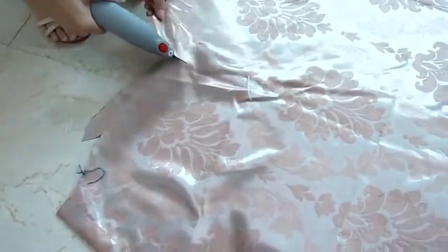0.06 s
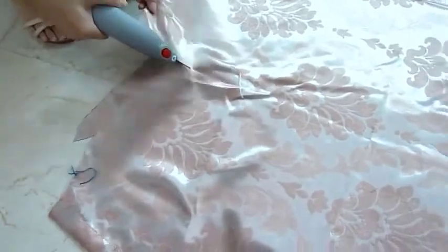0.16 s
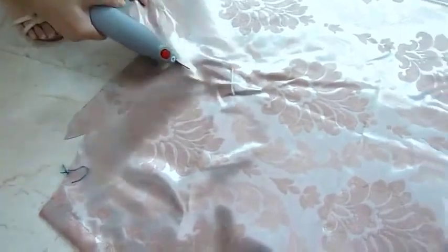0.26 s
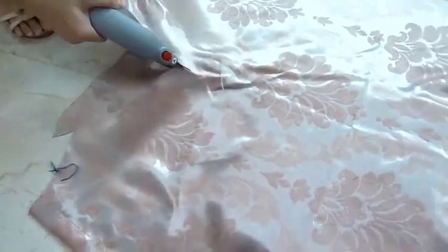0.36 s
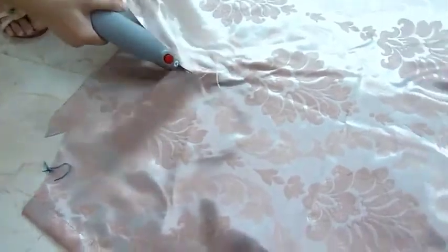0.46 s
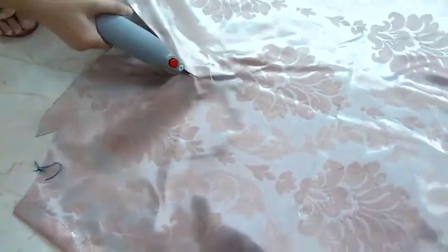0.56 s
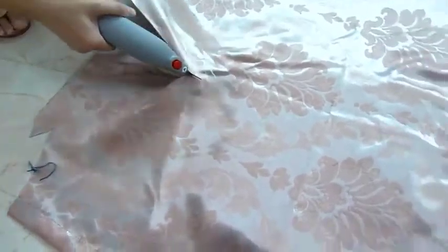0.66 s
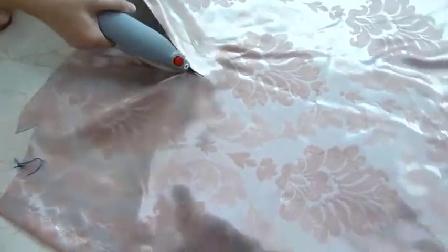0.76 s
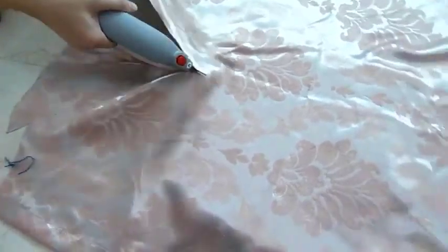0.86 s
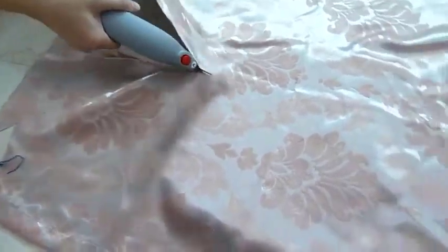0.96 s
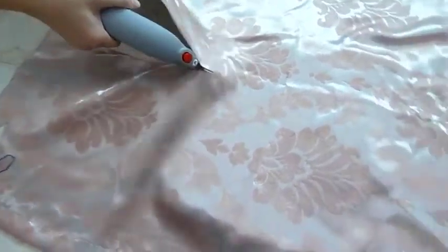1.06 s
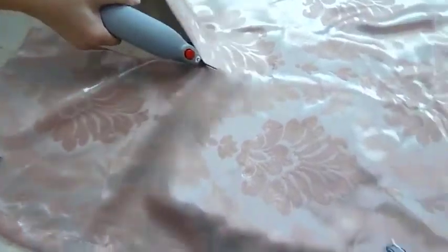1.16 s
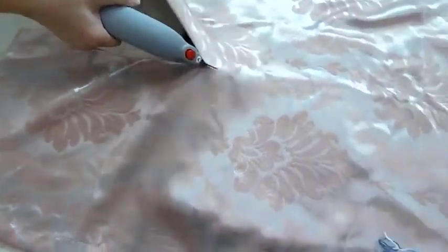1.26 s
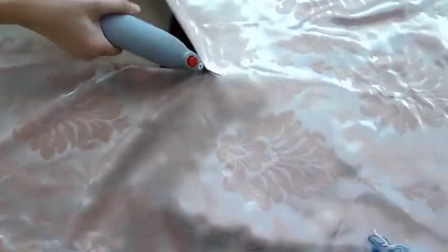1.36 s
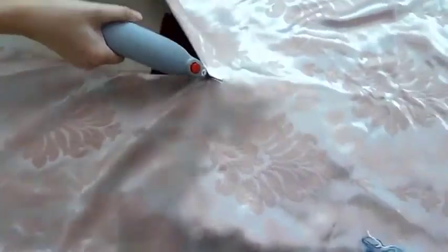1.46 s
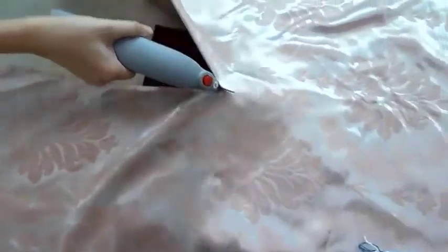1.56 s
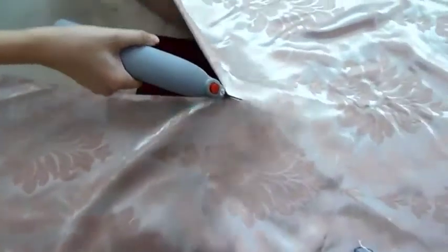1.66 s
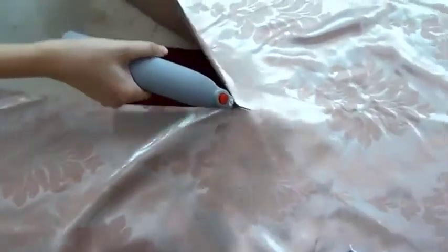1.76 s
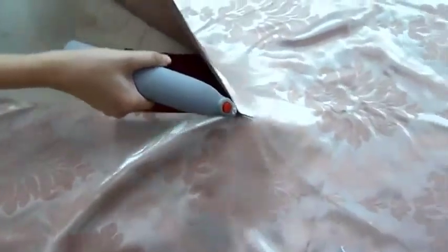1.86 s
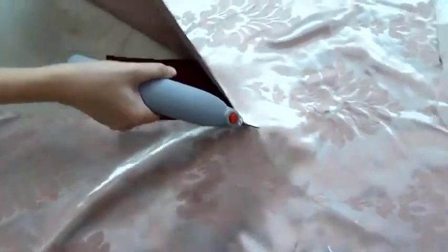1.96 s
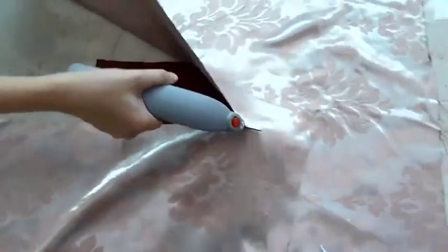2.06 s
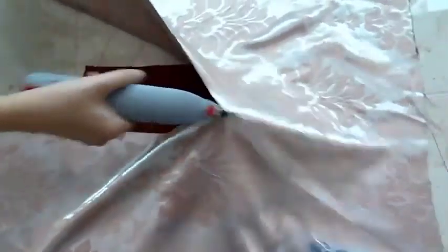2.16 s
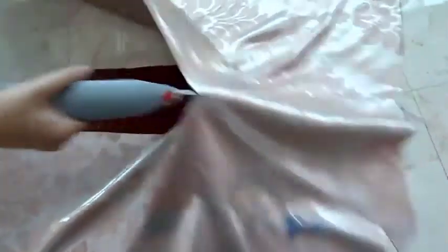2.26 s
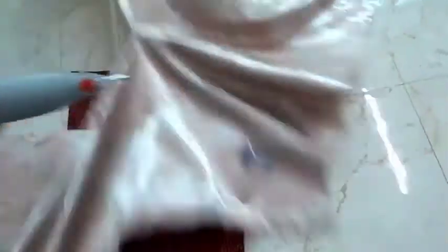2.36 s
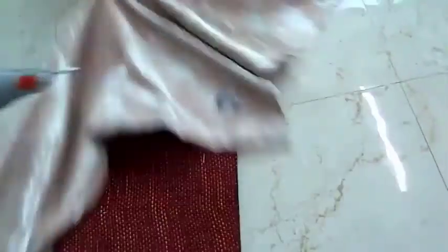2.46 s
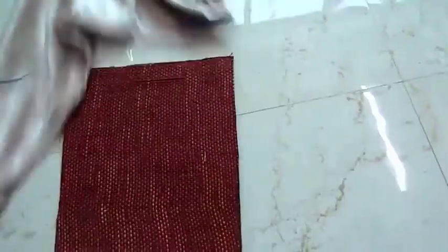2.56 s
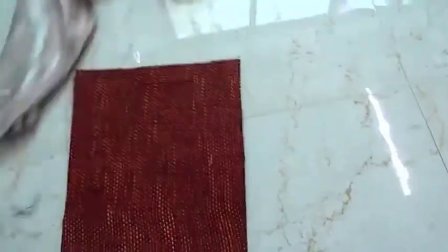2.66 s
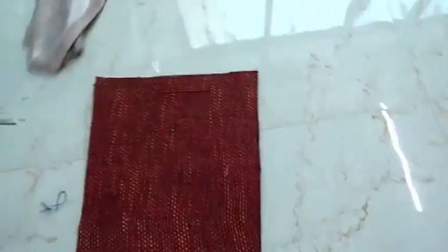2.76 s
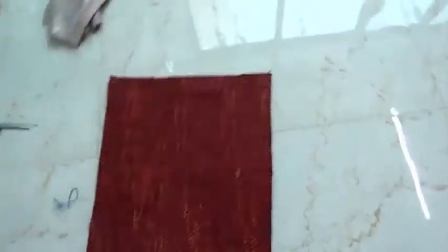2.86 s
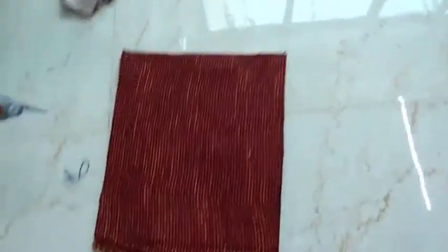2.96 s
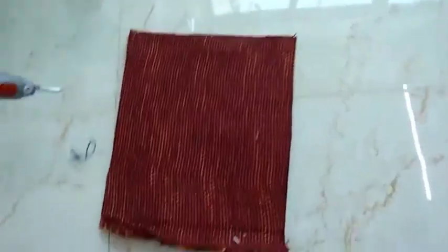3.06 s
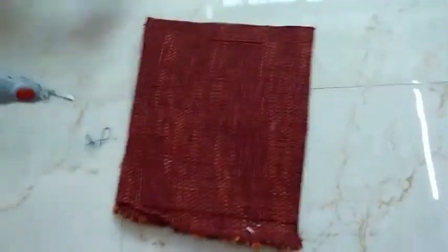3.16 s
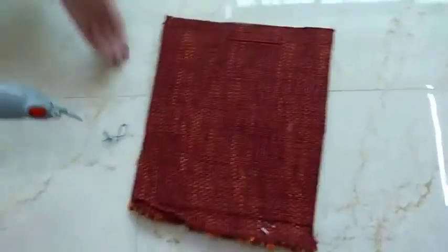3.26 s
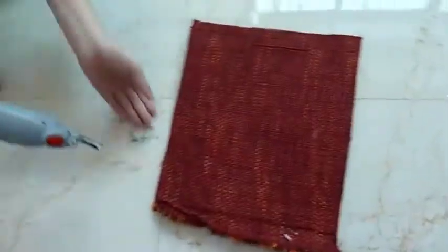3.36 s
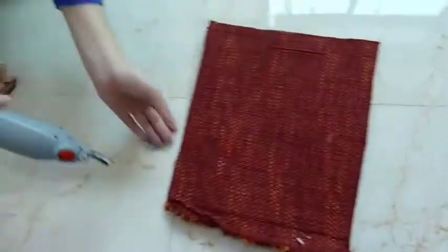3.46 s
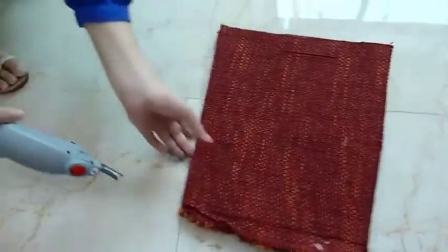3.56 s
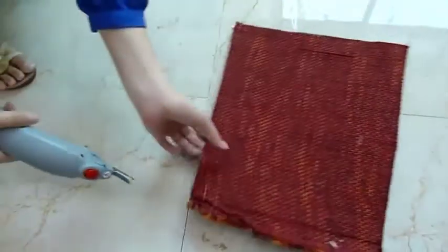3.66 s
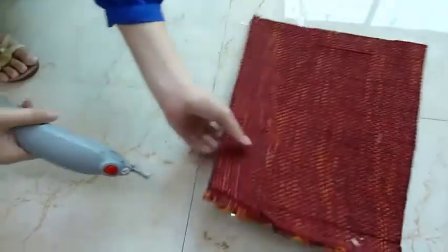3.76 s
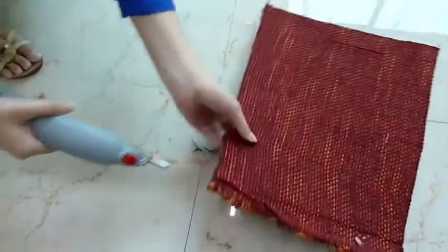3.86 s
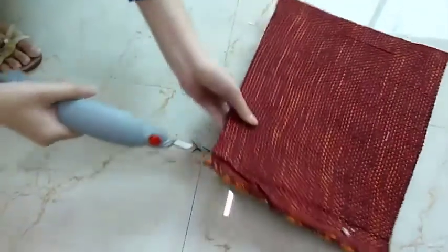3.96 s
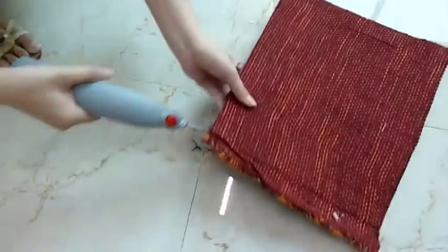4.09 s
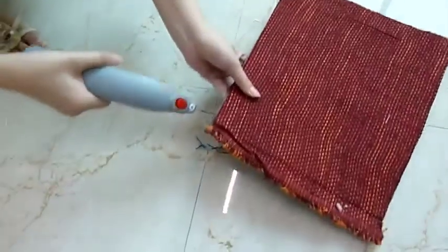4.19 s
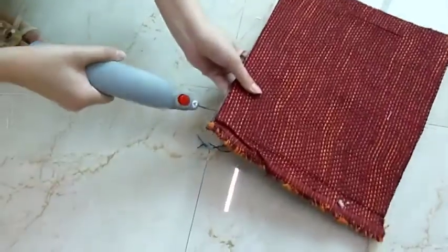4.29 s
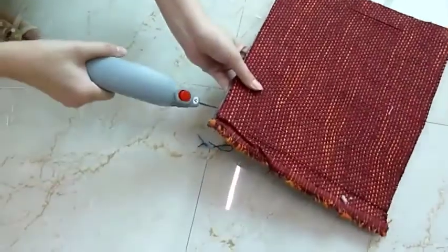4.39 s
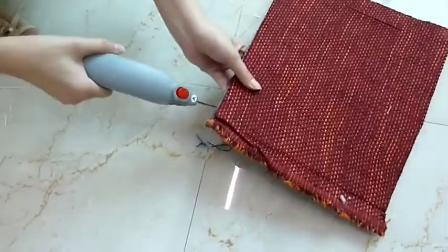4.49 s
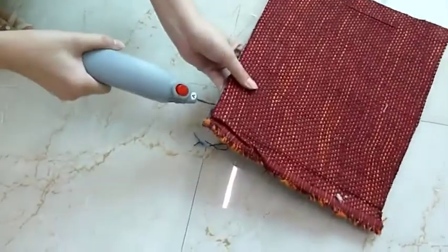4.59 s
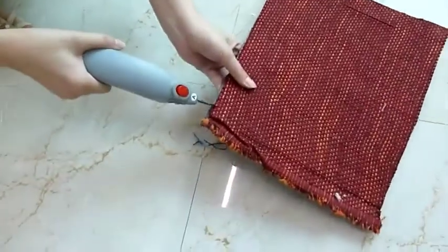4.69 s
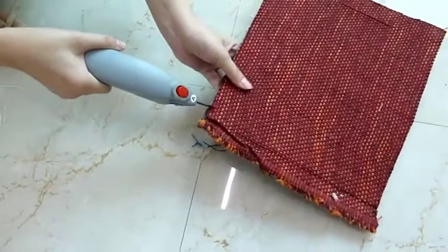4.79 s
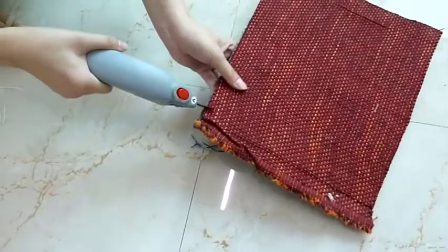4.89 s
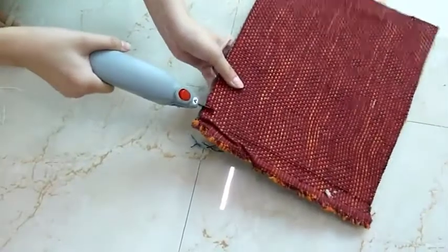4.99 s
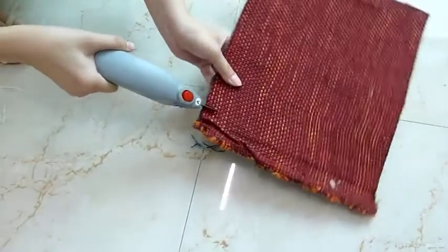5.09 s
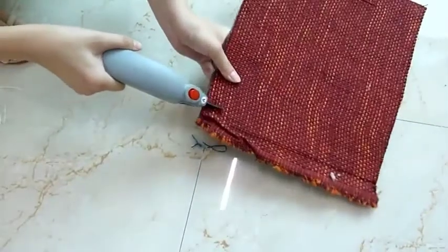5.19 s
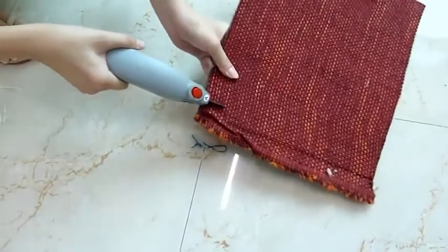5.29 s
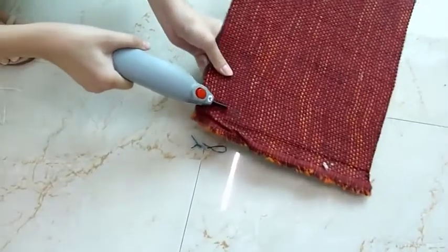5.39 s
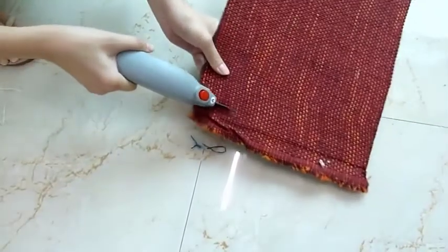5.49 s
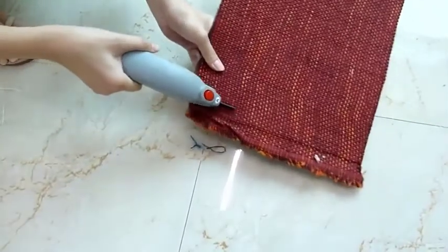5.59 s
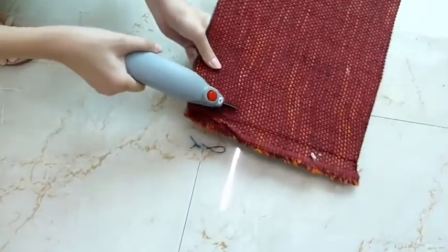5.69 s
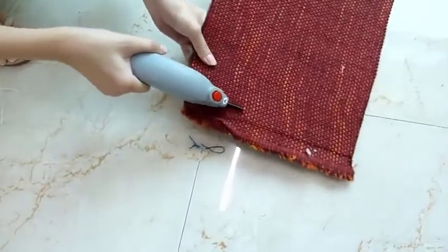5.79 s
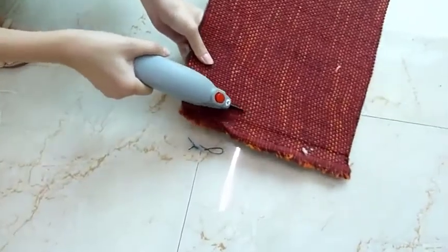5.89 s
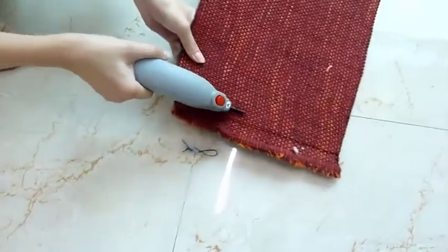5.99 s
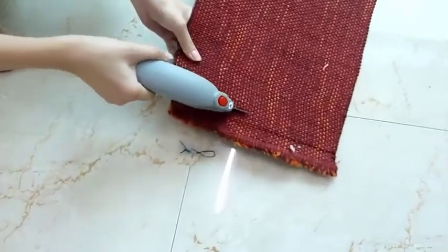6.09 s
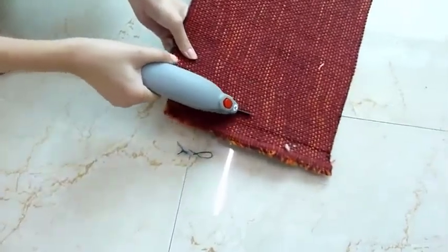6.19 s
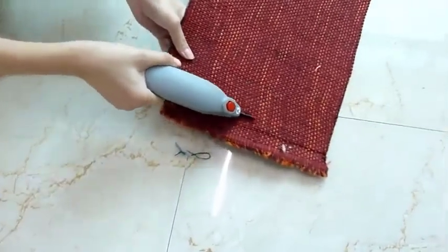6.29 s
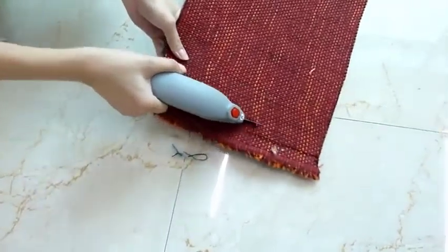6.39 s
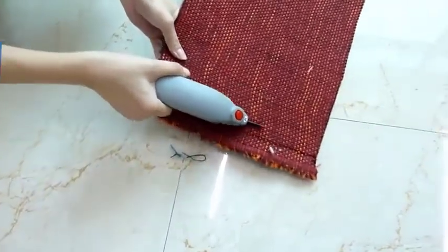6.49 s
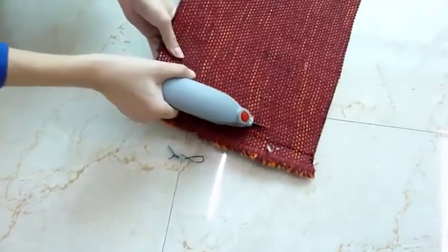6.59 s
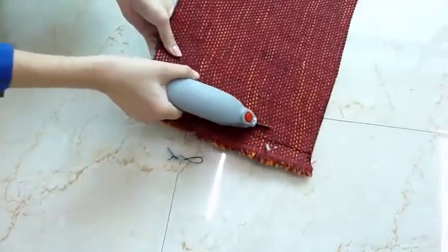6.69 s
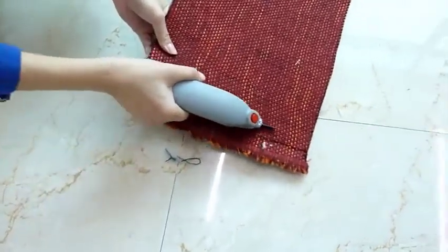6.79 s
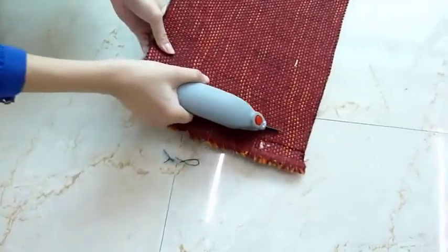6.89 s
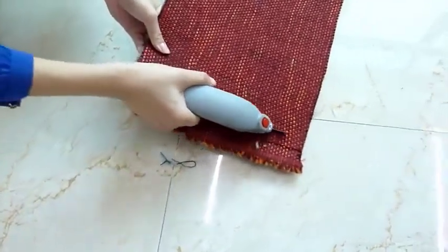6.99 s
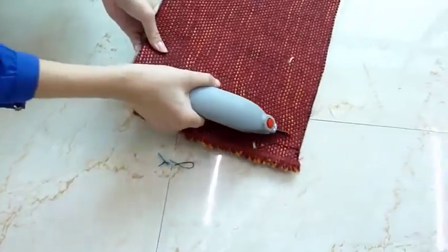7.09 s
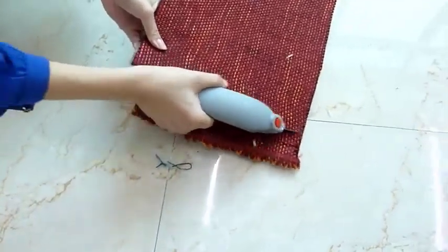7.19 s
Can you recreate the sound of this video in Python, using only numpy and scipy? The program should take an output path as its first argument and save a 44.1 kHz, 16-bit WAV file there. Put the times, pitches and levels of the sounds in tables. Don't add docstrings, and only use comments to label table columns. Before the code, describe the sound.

From the start, a handheld electric cutter buzzes right at the microphone: a rattling, gritty whir with a whining gear tone and very fast blade snaps, nearly sixty a second, cutting thin cloth. A slight hollow hum grows beneath it. At about 2.1 seconds it is switched off and runs down within a few tenths, with cloth sweeping away. From 2.5 to 4.7 seconds the room is quiet, with soft hiss and faint distant machinery drone; small knocks cluster around 2.9, lighter ticks come near 3.2 and 3.6, and gentle fabric brushes pass. At about 4.8 the motor clicks and jolts on, loudest and harshest just afterwards with a knock at 4.9. It bites into a thick mat, the strokes sagging to around forty a second, coarser and throbbing, with metallic singing after 6.3, still running at the end around 7.2.

```python
import sys
import numpy as np
from scipy import signal
from scipy.fft import rfft, irfft
from scipy.io import wavfile
from scipy.ndimage import uniform_filter1d, map_coordinates

SR = 44100
rng = np.random.default_rng(int(sys.argv[2]) if len(sys.argv) > 2 else 0)


def master_out(mix):
    frames = np.transpose(np.atleast_2d(mix))
    ceiling = np.clip(frames, -1, 1)
    pcm = np.round(ceiling * 32767).astype(np.int16)
    wavfile.write(sys.argv[1], SR, pcm)


def elevation(decibels):
    levels = np.asarray(decibels, float)
    return 10 ** (levels / 20)


N = 319284

BITE_AT, SNAP_AT = .3, .655
OFF_S, STILL_S, ON_S = 2.13, 2.5, 4.77


def evened(x):
    return x / np.sqrt(np.mean(x ** 2) + 1e-20)


def read(points, hz):
    f, value = np.transpose(points)
    return np.interp(np.log(hz + 1), np.log(f + 1), value)


def colour_db(colour, modes, hz):
    return read(colour, hz) + sum(top / (1 + ((hz - f) / (w / 2)) ** 2) for f, w, top in modes)


def curves(rows):
    s, *columns = np.transpose(rows)
    return [np.interp(np.arange(N) / SR, s, c) for c in columns]


def glided(x):
    return uniform_filter1d(x * 1., size=round(.05 * SR))


def wander(size):
    return evened(uniform_filter1d(uniform_filter1d(rng.standard_normal(N), size), size))


def bump(turns, at, sharp):
    return np.exp(sharp * (np.cos(2 * np.pi * (turns - at)) - 1))


def ring(x, hz, width):
    return signal.lfilter(*signal.iirpeak(hz, hz / width, SR), x)


def band(hz, width):
    r = np.exp(-np.pi * width / SR)
    slow = signal.lfilter([1], np.convolve([1, -r], [1, -r]), rng.standard_normal((2, N)))
    carrier = np.exp(2j * np.pi * np.cumsum(hz * np.ones(N)) / SR)
    return evened(((slow[0] + 1j * slow[1]) * carrier).real)


def hiss(colour, modes=(), patchy_db=2.0):
    # Hz, left-right likeness (0 to 1).
    likeness = [(60, 0.76), (150, 0.88), (380, 0.91), (950, 0.8), (2380, 0.95), (5980, 0.26), (15000, 0.31)]
    frames, hz = N // 256 + 5, np.fft.rfftfreq(1024, 1 / SR)
    a, b, c, d, patches = rng.standard_normal((frames, 513, 5)).T
    patches = evened(uniform_filter1d(uniform_filter1d(patches, size=7, axis=0), size=30, axis=1))
    same = np.clip(read(likeness, hz), 0, 1)[:, None]
    left = a + 1j * b
    right = same * left + np.sqrt(1 - same ** 2) * (c + 1j * d)
    level_db = colour_db(colour, modes, hz)[:, None] + patchy_db * patches
    z = np.array([left, right]) * elevation(level_db)
    return evened(signal.istft(z, nperseg=1024, noverlap=768)[1][:, :N])


def air():
    # Hz, dB per Hz.
    air_colour = [(12, -42), (20, -7), (49, -12.5), (146, -6.5), (182, -7), (222, -5.5), (357, -3),
                  (513, -11), (574, -8), (825, -8.5), (897, -11), (3630, -22.5), (16000, -41)]
    # Hz, width in Hz, level in dB.
    drones = [(49.2, 22, -63.5), (118, 8.6, -62.5), (187, 15, -62.5), (251.4, 16, -60), (349.6, 6.9, -59.5),
              (428, 22, -67)]
    return elevation(-48) * hiss(air_colour, patchy_db=0.2) + sum(elevation(db) * band(hz, w) for hz, w, db in drones)


def room(x):
    # Hz, time to fall 60 dB in seconds.
    decay = [(300, 0.35), (2000, 1), (10000, 0.8)]
    echoes = np.zeros((2, SR // 2))
    at = np.arange(100, SR // 2 - 20, 20) + rng.integers(0, 20, (2, (SR // 2 - 101) // 20))
    np.put_along_axis(echoes, at, rng.choice([-1., 1.], at.shape), 1)
    hz, t, z = signal.stft(echoes, SR, nperseg=256)
    tail = signal.istft(z * elevation(-60 * t / read(decay, hz)[:, None]), SR, nperseg=256)[1]
    return signal.fftconvolve(x[None], tail / np.linalg.norm(tail[0]), axes=1)[:, :N]


def rustle(t):
    # Hz, dB per Hz.
    cloth_colour = [(200, -22), (500, -4), (1250, -13), (2100, -13), (5000, -12), (10200, -15.5),
                    (14500, -21), (16000, -25)]
    # middle in seconds, half length in seconds, level in dB.
    sweeps = [
        (2.36, .11, -41),
        (2.875, 0.028, -57),
        (2.97, 0.078, -46),
        (3.477, 0.12, -49.5),
        (3.664, 0.083, -54),
        (4.17, .04, -56),
        (4.758, 0.1, -51.5),
    ]
    power = elevation(2 * -55) + sum(elevation(2 * db) * np.exp(-((t - s) / d) ** 2) for s, d, db in sweeps)
    return np.sqrt(power) * hiss(cloth_colour, patchy_db=1.5)


def taps():
    # start in seconds, peak in dB, Hz, time to fall 60 dB in seconds, noise tick in dB.
    knocks = [(2.849, -38, 1300, .014, -37), (2.852, -45, 840, .2, -70), (2.917, -36, 2600, .022, -47),
              (2.9435, -30, 930, .024, -44), (2.977, -33, 400, .03, -44), (2.988, -32, 560, .03, -50),
              (2.992, -33, 300, .04, -50), (3.248, -50, 5000, .006, -48), (3.624, -44, 11000, .008, -60),
              (4.7675, -36, 2300, .012, -26), (4.913, -22, 1300, .025, -40), (4.918, -25, 900, .015, -45),
              (4.922, -27, 550, .02, -40)]
    out, t = np.zeros(N), np.arange(3000) / SR
    for (s, db, hz, t60, tick_db), noise in zip(knocks, rng.standard_normal((30, 3000))):
        onset = np.minimum(t / 0.00049, 1)
        knock = np.sin(2 * np.pi * hz * t) * elevation(db - 60 * t / max(t60, .004)) * onset
        tick = noise * elevation(tick_db + 8 - 60 * t / .012)
        out[round(s * SR):][:3000] += knock + ring(ring(tick, 4200, 6000), 4200, 7000)
    return out


def crank():
    # time in seconds, strokes per second. First the run on thin cloth.
    thin = [(0, 59.15), (.203, 59.26), (.605, 58.15), (1.393, 58.38), (1.996, 56.3), (2.13, 56.81)]
    coast = [
        (2.2, 48),
        (2.3, 30),
        (2.5, 8),
    ]
    spin_up = [
        (4.765, 7.6),
        (4.79, 30),
        (4.81, 35),
        (4.835, 43),
    ]
    thick = [(4.86, 52.7), (4.99, 52.46), (5.45, 44.09), (5.653, 43.62), (6.178, 38.52), (6.373, 41.52),
             (6.46, 37.47), (6.84, 41.73), (7.24, 40.35)]
    # time in seconds, turns.
    position = [
        (0, .04),
        (4.86, .35),
    ]
    rate, = curves(thin + coast + spin_up + thick)
    turns = np.cumsum(rate) / SR
    (_, first), (s, second) = position
    at = round(s * SR)
    return turns + np.where(np.arange(N) < at * 2 // 3, first, second - turns[at]), rate


def hand_push():
    # time in seconds, grinding in dB, pan in dB. First the thin cloth.
    thin = [(0, -22, 2), (.9, -22.5, 3), (1.5, -24, 2), (2.12, -22, 1.1), (2.34, -35.5, 2.5),
            (2.38, -42, 0), (2.5, -47.5, 3)]
    thick = [(4.77, -33, 3.1), (4.8, -21, 2.3), (4.87, -17, 2.2), (4.93, -23.5, 3), (5.2, -21, 2.1),
             (6.1, -21.5, 1.5), (6.399, -23, 1.8), (7.24, -23, 0.9)]
    return curves(thin + thick)


def stages(t):
    # start in seconds, gear pitch under load over its mean,
    # partial 1 in dB, partial 2 in dB, end of bite in dB.
    cut = [(0, 0.98, -35.5, -40, -48), (.72, 1.04, -31, -34, -44), (1.05, 1.06, -33, -38, -35),
           (1.7, 1.014, -34.5, -36, -46), (2.14, 0.75, -69, -71.5, -75), (4.772, 0.93, -50, -37, -24),
           (4.805, 1.0, -49, -28.5, -29), (4.87, 1.02, -33, -20.5, -41), (4.95, 1.02, -28.5, -26, -40),
           (5.08, 1.01, -24.5, -28, -30), (5.2, 1.006, -27, -23.5, -43), (5.42, 1.034, -33, -22, -30),
           (5.54, 1.045, -35.5, -25, -29.5), (5.78, 1.035, -45, -29, -26), (5.86, .93, -40, -26, -32),
           (6.25, 0.93, -39, -26.5, -41), (6.8, 0.91, -37.5, -28, -29.5)]
    # start in seconds, length in seconds, level in dB.
    chatter = [
        (.15, 1.5, -36),
        (4.87, 0.23, -17.5),
        (5.34, 0.16, -23),
        (6.361, 0.074, -41),
        (6.58, .7, -28.5),
    ]
    rest_db = -40.5
    s, *columns = np.transpose(cut)
    now = np.clip(np.searchsorted(s, t, side="right") - 1, 0, None)
    chatter_db = rest_db + sum((db - rest_db) * (t > a) * (t < a + d) for a, d, db in chatter)
    chatter_db = chatter_db - 35 * (t > OFF_S) * (t < ON_S)
    return [glided(c[now]) for c in columns] + [glided(chatter_db)]


def hum(turns):
    # multiple of the stroke rate, level in dB.
    shaft = [(1, -88), (2, -21.5), (3, -57), (4, -13.5), (5, -35), (6, -43.5), (7, -19), (8, -16),
             (9, -21.5), (10, -15), (11, -11), (12, 7.5), (13, -5.5), (14, -5.5), (15, -9), (16, -9.5),
             (17, -12), (18, -1), (19, -19), (20, -31), (21, -51), (22, -8.5), (23, -43), (24, -10.5),
             (25, -9), (26, -34), (27, -6), (28, -31), (29, -14), (30, -22)]
    # multiple of the stroke rate, level in dB.
    mesh_lines = [(35, -6), (36, -1), (37, 5)]
    late_orders = (14, 18)
    # time in seconds, level in dB.
    waking = [(.45, -16), (.8, 0)]
    lines, late_db = np.zeros(N), curves(waking)[0]
    for k, db in shaft + mesh_lines:
        drift_db = (1.5 if k == 12 else 3) * wander(size=3000) + (k in late_orders) * late_db
        lines += elevation(db + drift_db) * np.cos(2 * np.pi * (k * turns + rng.random()))
    return evened(lines)


def grip(t):
    growth = elevation(np.minimum(-63.5 + 9 * t, -41))
    dying = elevation(-62 * np.maximum(t - OFF_S - .12, 0)) * glided(t < 2.37)
    kick = elevation(-37) * np.exp(-((t - ON_S - .025) / 0.014) ** 2)
    second = elevation(-43.5) * (t > ON_S + .02) + kick
    return (growth * dying + second) * band(811, width=290)


def blade(t, pulse):
    # start in seconds, length in seconds, Hz, width in Hz, level in dB.
    songs = [
        (1.72, .56, 2356, 400, -36),
        (2.137, 0.21, 1202, 500, -46),
        (4.798, 0.22, 5540, 260, -31),
        (6.3, 1.0, 5516, 320, -32.5),
        (6.68, 0.59, 7010, 220, -34),
    ]
    singing = sum(glided((t > s) * (t < s + d)) * elevation(db) * band(hz, w) for s, d, hz, w, db in songs)
    return singing * (0.27 + pulse)


def snaps(turns):
    # Hz, width in Hz, level in dB.
    slap_modes = [(2330, 490, -9), (4180, 460, 4.5), (5650, 470, 3.5), (6370, 720, 5), (10200, 360, -48)]
    at = np.flatnonzero(np.diff(np.floor(turns - SNAP_AT)) == 1)
    draws = rng.standard_normal((600, 1 + len(slap_modes)))[:len(at)]
    hits = np.clip(at + np.round(8.0 * draws[:, 0]).astype(int), 0, N - 1)
    t, out = np.arange(400) / SR, np.zeros(N)
    for k, (hz, width, db) in enumerate(slap_modes):
        train = np.zeros(N)
        train[hits] = elevation(db + 1.5 * draws[:, k + 1] + 1.5 * draws[:, 1])
        ringing = np.sin(2 * np.pi * hz * t) * t * width * np.exp(-2 * np.pi * width * t / 2)
        out += signal.oaconvolve(train, ringing)[:N]
    return elevation(-32.5) * evened(out)


def gear(turns, rate, drag, partials_db, thick):
    # Hz, width in Hz, level in dB.
    struck_modes = [(4370, 240, -7), (5430, 100, 0.5), (6980, 150, -2), (7760, 150, -3.5), (8860, 340, -8)]
    gear_teeth = 36
    stroke = 2 * np.pi * (turns - BITE_AT)
    mean_hz = gear_teeth * rate
    sag = np.clip(drag - 1, -.15, .15) * mean_hz
    hz = mean_hz + sag * np.cos(stroke) - (.02 + .035 * thick) * mean_hz * np.sin(stroke)
    slack = (0.0075 + 0.042 * thick) * wander(size=250) + 0.28 * thick * wander(size=3000)
    mesh = 2 * np.pi * (np.cumsum(hz) / SR + slack)
    slowed = 2 * np.pi * (.93 * gear_teeth * turns + slack)
    first, second, end, upper = elevation(partials_db)
    free = np.clip(np.gradient(rate) * SR / 250, 0, .8)
    bite = free + (1 - free) * bump(turns, BITE_AT, 1.2 + 1.1 * thick)
    clatter = sum(np.cos(k * mesh + k * k) for k in range(3, 8)) + 1.45 * rng.standard_normal(N)
    teeth = upper * bump(turns, BITE_AT - .03, 2.6) * clatter
    tone = (first * np.cos(mesh) + second * np.sin(2 * mesh)) * bite
    end_tone = np.cos(3 * slowed) + 0.62 * np.cos(2 * slowed)
    tone = tone + end * end_tone * bump(turns, BITE_AT + .17, 1.8)
    chatter = sum(elevation(db) * ring(teeth, f, w) for f, w, db in struck_modes)
    return 2 * (tone * elevation(0.73 * wander(size=400)) + chatter)


def worn_track(turns, colour, modes):
    faces = irfft(rng.standard_normal((200, 300)) + 1j * rng.standard_normal((200, 300)), 2048)
    rubbed = map_coordinates(faces, [turns / 5 % 200, turns % 1 * 2048], order=3, mode="grid-wrap")
    level_db = colour_db(colour, modes, np.fft.rfftfreq(N, 1 / SR))
    return evened(irfft(rfft(rubbed) * elevation(level_db), N))


def grinding(t, turns, rate, grind_db, pulse, thick, driven):
    # Hz, dB per Hz.
    thin_colour = [(150, -54), (250, -37), (493, -23), (640, -10.5), (686, -17), (938, -15.5), (1020, -10),
                   (1790, -9), (2130, 3.5), (2280, 1), (3340, -3), (4120, -2.5), (9490, -5.5), (14700, -13),
                   (16000, -38)]
    thick_colour = [(150, -63), (250, -24), (528, -15), (607, -23), (761, -22.5), (1180, -17), (1550, -6.5),
                    (1950, -6.5), (2710, -1), (3520, -1.5), (5070, -3.5), (5630, -2.5), (9490, -8),
                    (14400, -13.5), (16000, -23)]
    # Hz, width in Hz, dB over the grinding.
    thin_body = [(770, 71, 8), (1490, 500, -0.5), (2150, 240, 0), (4170, 290, 2.5), (4680, 250, 7),
                 (5900, 1100, 6), (6800, 430, 2.5), (7660, 160, 2.5), (9530, 270, 4)]
    thick_body = [(1064, 110, 10), (1647, 180, 5.2), (4430, 450, 3.7), (5710, 420, 4), (7900, 220, 1),
                  (7660, 190, 1.5), (9330, 350, 4.4)]
    slow = np.sqrt(np.clip((55 - rate) / 50 + thick, 0, 1))
    fresh = slow * hiss(thick_colour, thick_body) + np.sqrt(1 - slow ** 2) * hiss(thin_colour, thin_body)
    again = np.where(thick, worn_track(turns, thick_colour, thick_body),
                     worn_track(turns, thin_colour, thin_body))
    engaged = np.clip((t - ON_S) / 0.16, 0, 1)
    thin_share = elevation(-4) * (.5 + .5 * driven) * (1 - thick)
    share = np.clip(thin_share + engaged * elevation(-4.5 - 0.5 * (t - 5)), 0, 1)
    grind = np.sqrt(1 - share ** 2) * fresh + share * again
    depth = np.select([t < OFF_S, t > 5.12], [0.29, 0.36], 0.14)
    throb = np.clip(glided(depth), 0, .95)
    return grind * elevation(grind_db - 2.0 + 1.42 * wander(size=60)) * (1 - throb + 2 * throb * pulse)


def leaned(x):
    # Hz, left minus right in dB.
    tilt = [(500, 0), (1200, .5), (2300, -1), (4500, .9), (8000, .3), (13000, -1)]
    lean = read(tilt, np.fft.rfftfreq(N, 1 / SR)) - .8
    return irfft(rfft(x, axis=1) * elevation(np.outer([.5, -.5], lean)), N, axis=1)


def scene():
    turns, rate = crank()
    t = np.arange(N) / SR
    thick, driven = 1. * (t > ON_S), glided(t < OFF_S)
    running = np.interp(t, [STILL_S - .05, STILL_S, ON_S, ON_S + .005], [1, 0, 0, 1])
    grind_db, pan_db = hand_push()
    drag, *partials_db = stages(t)
    pulse = bump(turns, BITE_AT - .05, 0.71) + (1 - thick) * 0.74 * bump(turns, SNAP_AT + 0.14, 4.1)
    grind = grinding(t, turns, rate, grind_db, pulse, thick, driven)
    engaged = np.clip((t - ON_S) / 0.16, 0, 1)
    low = (elevation(-35) * driven + elevation(-53) * engaged) * hum(turns) + grip(t)
    slap = np.clip((OFF_S + 0.11 - t) / 0.062, 0, 1) * snaps(turns)
    clear = gear(turns, rate, drag, partials_db, thick) + slap + blade(t, pulse)
    clear = running * clear + taps()
    near = running * grind + clear + elevation(-10) * room(clear)
    cutter = leaned(near * elevation(np.outer([.5, -.5], pan_db)))
    loud_db = grind_db * running - 60 * (1 - running)
    ducked = elevation(-4.5 * np.clip((loud_db + 48) / 20, 0, 1))
    return cutter + running * low + (1 - running) * rustle(t) + ducked * air()


def roll_off(x):
    return signal.sosfilt(signal.butter(12, 16450, fs=SR, output="sos"), x)


def record(dry):
    lowpass = signal.firwin(255, 15750, window=("kaiser", 9), fs=SR)
    limited = signal.oaconvolve(dry, lowpass[None], "same")
    return roll_off(limited)


dry = scene()
out = record(dry)
master_out(out)
```